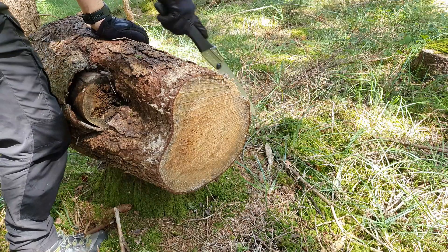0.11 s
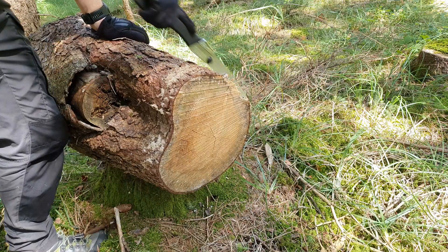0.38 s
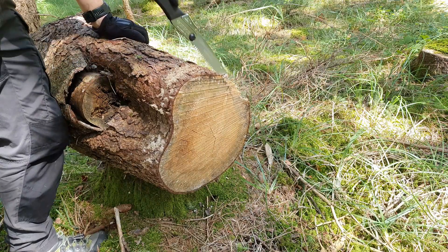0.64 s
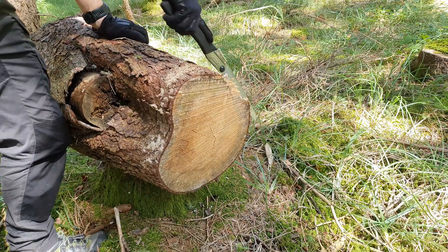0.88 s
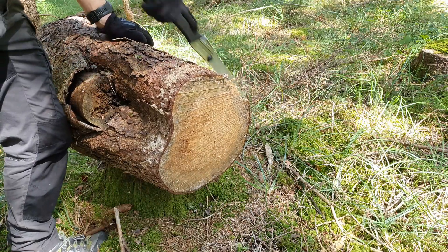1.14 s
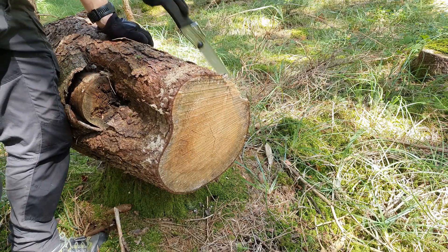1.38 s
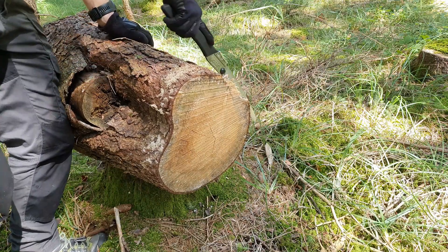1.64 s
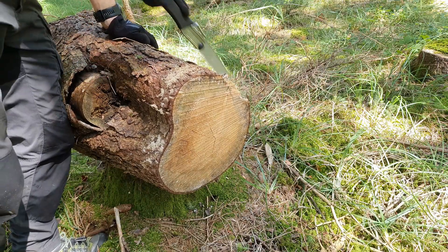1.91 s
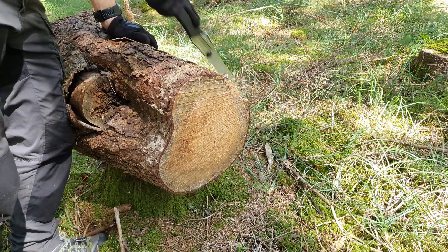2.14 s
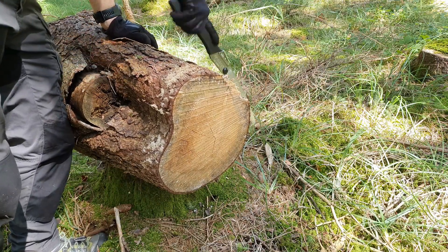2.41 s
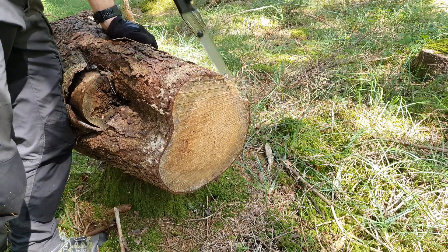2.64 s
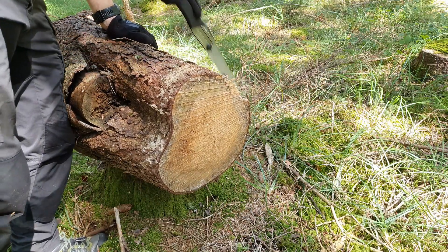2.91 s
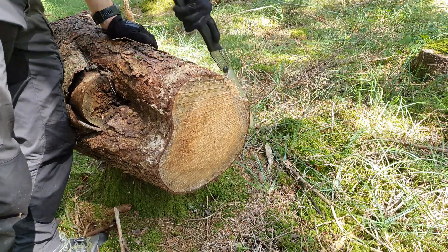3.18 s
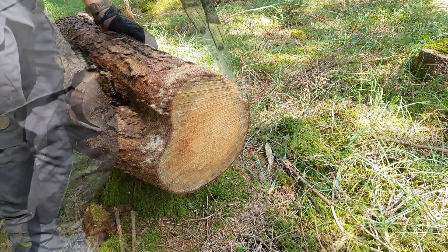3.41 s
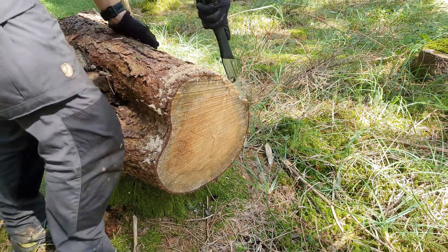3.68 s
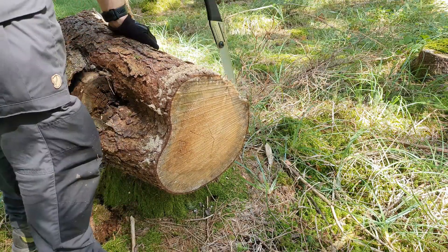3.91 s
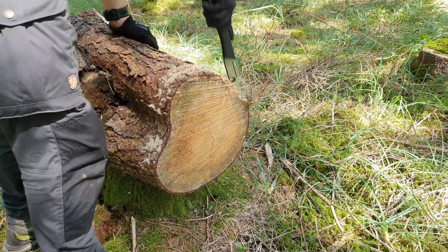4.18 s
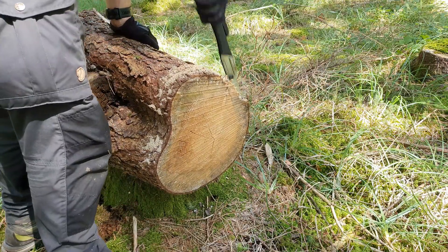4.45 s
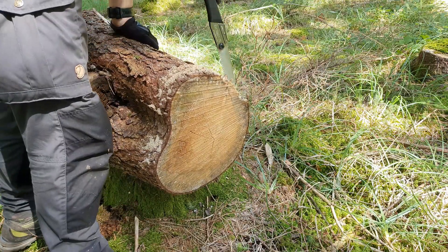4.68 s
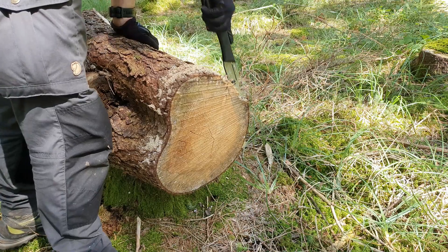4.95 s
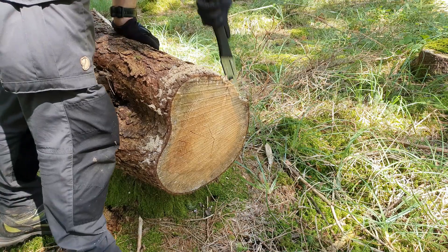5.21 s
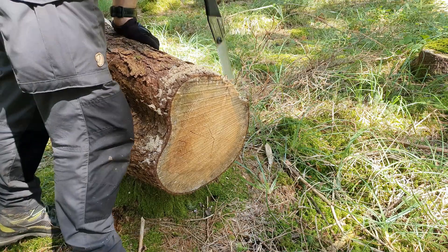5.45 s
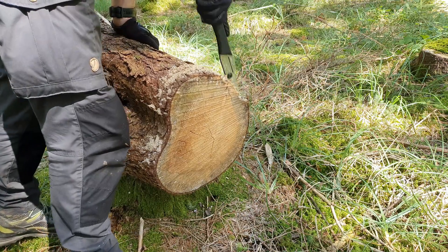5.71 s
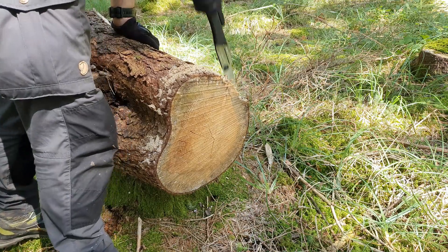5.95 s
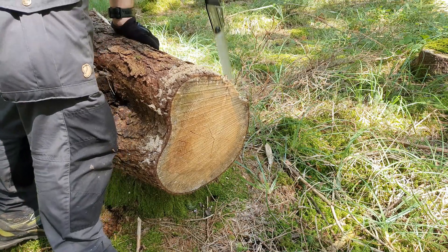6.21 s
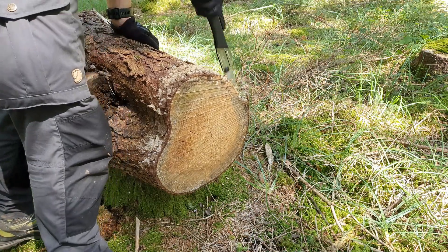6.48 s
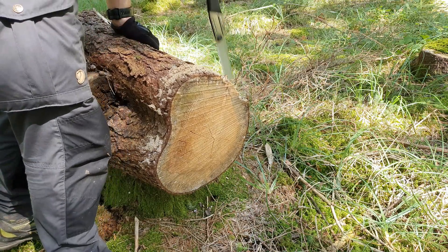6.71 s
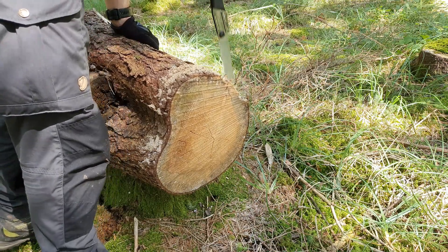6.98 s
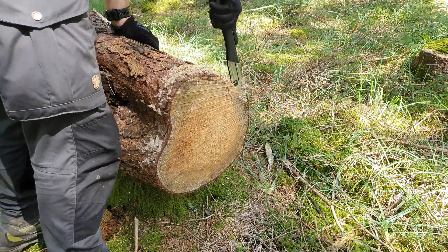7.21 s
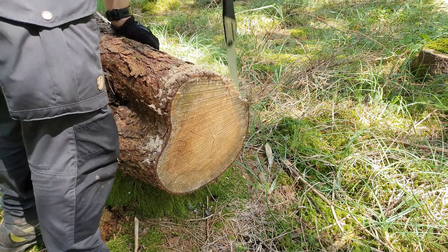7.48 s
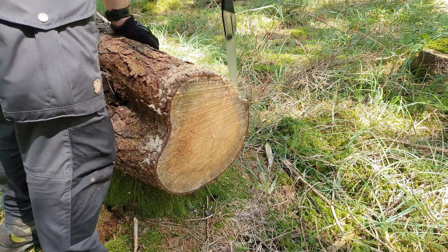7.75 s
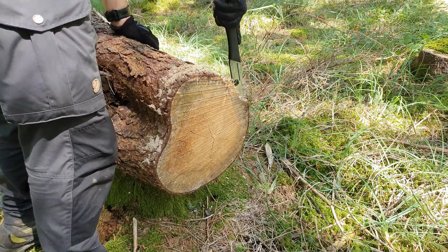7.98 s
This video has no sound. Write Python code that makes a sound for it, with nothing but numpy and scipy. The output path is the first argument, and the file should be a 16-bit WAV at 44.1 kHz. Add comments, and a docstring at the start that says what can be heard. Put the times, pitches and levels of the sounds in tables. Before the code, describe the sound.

Close, dry outdoor sound of a hand saw cutting a thick log, about five alternating strokes a second. Each stroke swells and fades as a gritty rasp with bright sawdust fizz and a hollow woody ring. Handle knocks and a sharp crack punctuate the first half. A near-silent blink and a light drag interrupt midway, then sawing resumes softer and brighter over faint forest air.

```python
"""A folding hand saw rasps through a thick log in a quiet forest, about five strokes a second.
Noise bursts of tearing fibres make the rasp, the fizz of steel on sawdust and, with the buzz of the
passing teeth, the ring of the log; push and pull excite its modes differently.
Decaying sines make knocks of the handle on the bark and dry snaps, over a faint hush of air.
Near the middle the sound drops almost to silence for a few milliseconds."""
import sys
import numpy as np
from scipy import signal
from scipy.fft import rfft, irfft, next_fast_len
from scipy.io import wavfile
from scipy.ndimage import uniform_filter1d

SR = 44100
rng = np.random.default_rng(int(sys.argv[2]) if len(sys.argv) > 2 else 0)


def wav_record(signal):
    """Record a signal, one row per channel, as 16-bit PCM in the file named by sys.argv[1]."""
    frames = np.transpose(np.atleast_2d(signal))
    bounded = np.clip(frames, -1, 1)
    # unit amplitude maps onto the largest positive 16-bit level
    quanta = np.round(bounded * 32767).astype(np.int16)
    wavfile.write(sys.argv[1], SR, quanta)


def to_linear_factor(level_db):
    """Convert decibel levels (scalar or array-like) to linear amplitude factors."""
    exponent = np.asarray(level_db, float) / 20
    return 10 ** exponent


N = 357651

# strokes, push and pull in turn: (start [s], length [ms], teeth passing at full speed [Hz],
# lateness [power of the travel], rasp [dB], extra ring of the log [dB])
STROKES = [(-0.012, 146, 457, 0.86, -44.5, -1), (0.131, 213, 315.4, 0.9, -43, -1.5),
           (0.346, 177, 425.0, 1.29, -46.5, 0.0), (0.525, 218, 342.0, 0.87, -43.5, -2),
           (0.741, 172.6, 436.0, 1.11, -44.5, -2), (0.911, 222, 343, 1.12, -43.5, -3.5),
           (1.135, 173, 445.0, 0.96, -45.5, -1), (1.301, 232, 327, 0.91, -44.5, -0.5),
           (1.531, 177, 446.0, 1.09, -45.5, -0.5), (1.719, 212, 364.3, 0.97, -46.5, 0),
           (1.934, 189, 485, 0.97, -44.5, -1.5), (2.124, 194, 386, 0.91, -43.5, 1.5),
           (2.312, 166, 500.0, 1.22, -45, -1), (2.482, 199, 405.0, 1.04, -43.5, -0.5),
           (2.692, 178, 500.0, 0.98, -45.0, -1.5), (2.872, 194, 394, 0.93, -42.5, -1),
           (3.067, 172.5, 475.0, 1.23, -46.5, -0.5), (3.243, 202, 393.3, 0.97, -43.5, 1.5),
           (3.456, 321, 560.0, 1.02, -56.5, 2), (3.786, 232, 416.0, 0.86, -47.5, 0.5),
           (4.028, 153.4, 560.0, 0.69, -46.0, 2), (4.2, 216, 425.0, 0.76, -44, 0.0),
           (4.409, 166, 484.0, 1.02, -46.5, -1.5), (4.601, 191, 345.0, 0.77, -47, 1.0),
           (4.808, 161, 571.0, 0.72, -49, 0), (4.991, 195, 375.0, 0.79, -48, 1.5),
           (5.183, 175, 402, 0.86, -49.5, 0.5), (5.358, 210, 415.0, 0.86, -48.5, 0),
           (5.56, 177, 448.0, 0.82, -50.5, -4), (5.721, 242, 299.0, 1.015, -50, -2.5),
           (5.947, 154, 528.0, 0.92, -47, 0.5), (6.103, 219, 420.0, 0.94, -46.5, 1.0),
           (6.327, 165, 544.0, 0.96, -48.5, -1.0), (6.491, 240, 411.0, 0.84, -50, 0),
           (6.713, 178.5, 561.0, 1.33, -46, 0.5), (6.893, 227, 355.0, 0.84, -47.5, 0.5),
           (7.108, 165.6, 611.0, 1.38, -44.0, 0.5), (7.281, 228, 425.0, 1.03, -46, 0),
           (7.518, 137.4, 576.0, 1.03, -45, 1), (7.657, 235, 348.0, 0.91, -46, -1.0),
           (7.881, 172, 500.0, 1.1, -48, 2.5), (8.05, 238, 346.6, 1, -47.5, 0)]
# index of the stroke that is a light drag back; after it the blade is held steeper
REGRIP = 18


def evened(x):
    """Scales a signal to an RMS of 1."""
    return x / np.sqrt(np.mean(x ** 2) + 1e-20)


def wander(seconds):
    """Random curve of RMS 1, smoothed over the given time."""
    return evened(uniform_filter1d(rng.standard_normal(N), round(seconds * SR)))


def add(mix, s, sound):
    """Mixes a sound in at s seconds."""
    part = mix[round(s * SR):][:len(sound)]
    part += sound[:len(part)]


def colour(x, points):
    """Filters x by a spectrum of (frequency [Hz], relative level [dB]) points, to an RMS of 1."""
    size = next_fast_len(len(x))
    f, db = np.transpose(points)
    hz = np.fft.rfftfreq(size, 1 / SR)
    gain = to_linear_factor(np.interp(np.log(hz + 1), np.log(f + 1), db))
    return evened(irfft(rfft(x, size) * gain, size)[:len(x)])


def resonate(x, hz, width):
    """Resonance of peak gain 1: shifts the curve hz down to zero, smooths, and shifts back."""
    turn = np.exp(2j * np.pi * np.cumsum(hz * np.ones(len(x))) / SR)
    r = np.exp(-np.pi * width / SR)
    return 2 * (turn * signal.lfilter([1 - r], [1, -r], x / turn)).real


def ring(hz, db, t60, rise=0.00033, lag=0.):
    """A struck mode: a sine that swells briefly and dies by 60 dB in t60 seconds."""
    t = np.maximum(np.arange(round(.25 * SR)) / SR - max(lag, 0), 0)
    shape = (1 - np.exp(-(t / rise) ** 2)) * to_linear_factor(-60 * t / t60)
    return to_linear_factor(db) * shape / shape.max() * np.sin(2 * np.pi * hz * t)


def saw():
    """Tearing fibres feed rasp and fizz; they and the passing teeth ring the log, which also shudders."""
    # modes of the log: (frequency [Hz], width [Hz], level on the push [dB], level on the pull [dB])
    log_modes = [(500, 28.6, -4, -6.5), (614, 36, 2, -3), (747.7, 72, -5.5, -1.5), (928, 123, -6, -3.5),
                 (1006, 81, -5.5, -6.5), (1089, 48, -5.5, -8), (1172, 59, -7, -3), (1448, 42, -8, -7.5),
                 (1920, 83, -13, -31)]
    # torn fibres: (frequency [Hz], relative level [dB])
    rasp_spectrum = [(760, -26.5), (1300, -15.5), (1470, 1), (1630, -2.5), (1820, -0.5), (2020, -3),
                     (2890, -0.5), (3740, -2.5), (4950, -12), (6000, -19), (7800, -54), (13200, -120)]
    # steel on sawdust, blade steep and blade flatter: (frequency [Hz], relative level [dB])
    fizz_steep = [(3240, -14.5), (5500, -6.5), (6010, -6), (7190, 3.5), (8110, 4.5), (10100, 3.5),
                  (12900, -3.5), (15100, 2), (16000, -43)]
    fizz_flat = [(3240, -23), (5500, -20.5), (6200, -3), (7190, 4), (8110, 5.5), (9500, 3), (12500, -3.5),
                 (15100, 0.5), (16000, -31)]
    # teeth are set left and right in turn, so half orders sound too: (multiple of tooth rate, level [dB])
    orders = [(.5, -16), (1, -4), (1.5, -12.5), (2, -4.5), (3, -4.5)]
    # the log shudders on its bed: (frequency [Hz], relative level [dB])
    shudder_spectrum = [(24, -53), (45, -10), (76, 5), (145, 2), (248, 0), (329, 0), (450, -0.5),
                        (580, -47), (990, -120)]
    # slow change as the cut deepens: (time [s], fizz [dB], buzz of the teeth [dB], shudder [dB])
    drift = [(0, -0.5, -2.5, 7), (.6, 0, -1, 2.5), (1.3, -0.5, -3, 1.5), (2.1, -1.5, 2, 2.5),
             (2.9, -1.5, 2.5, -0.5), (3.5, 0.5, -4, 1.5), (4, 3, -12, 3), (4.6, 0, 1.5, -4),
             (5.2, 1, -6.5, 4), (5.8, -1.5, 3.5, -3), (6.4, -1, -3.5, -2.5), (7, -1, -2, 0.5),
             (7.6, -0.6, -0.5, -2), (8.1, -0.8, -1.5, 6)]
    # on (push, pull): buzz of the teeth over the ring [dB]; shudder over the rasp [dB]
    stroke_buzz_db = (-8, -12)
    stroke_shudder_db = (-28.5, -16)

    t = np.arange(N) / SR
    turns, speed, pull, rasp_db, ring_db, fizz_db = arm(t)
    drift_s, *drift_db = np.transpose(drift)
    brighter_db, buzz_db, shudder_db = (np.interp(t, drift_s, column) for column in drift_db)

    # each order of the tooth rate wanders in strength
    bite = evened(uniform_filter1d(rng.standard_normal((N, len(orders))), round(.012 * SR), 0)).T
    buzz = np.zeros(N)
    for (multiple, db), b in zip(orders, bite):
        buzz += to_linear_factor(db + 2.5 * b) * np.sin(2 * np.pi * multiple * turns)
    buzz *= to_linear_factor(np.take(stroke_buzz_db, pull) + buzz_db) * speed ** 0.5

    beat = 1 + 0.1 * np.cos(2 * np.pi * turns)  # tearing grows slightly stronger as each tooth bites
    fibres = beat * tearing(per_s=14000, spread_db=0.5, judder_db=1.18, judder_s=0.011)
    # sawdust sliding along the blade
    dust = tearing(per_s=19000, spread_db=0.5, judder_db=3.0, judder_s=0.0057)
    slide = fibres + 0.97 * dust
    fizz = np.where(t < STROKES[REGRIP][0], colour(slide, fizz_flat), colour(slide, fizz_steep))

    out = to_linear_factor(rasp_db) * colour(fibres, rasp_spectrum)
    out += to_linear_factor(rasp_db + fizz_db + brighter_db) * fizz
    out += chips(rasp_db)
    out += to_linear_factor(rasp_db + ring_db) * buzz

    drive = to_linear_factor(20.5) * tearing(per_s=4000, spread_db=3.5, judder_db=0.0, judder_s=0.0064)
    drive += to_linear_factor(11.5) * buzz
    drive *= to_linear_factor(rasp_db + ring_db)
    for k, (hz, width, push_db, pull_db) in enumerate(log_modes):
        # each mode wanders in strength and pitch as the blade moves in the cut
        louder, higher = wander(.08), wander(.08)
        mode_db = np.where(pull, pull_db, push_db) + 1.8 * louder
        out += (-1) ** k * resonate(drive * to_linear_factor(mode_db), hz * (1 + .008 * higher), width)

    shudder_db = rasp_db + np.take(stroke_shudder_db, pull) + shudder_db
    shudder_db = uniform_filter1d(shudder_db, round(0.015 * SR))
    return out + to_linear_factor(shudder_db) * colour(rng.standard_normal(N), shudder_spectrum)


def arm(t):
    """Turns of the tooth pattern, relative speed, direction, and the levels that follow the travel."""
    # course of a stroke, by direction and hold of the blade, then of the light drag back:
    # (share of the travel, rasp [dB], ring over the rasp [dB], fizz over the rasp [dB])
    push_flat = [(0.0, -36, -8, -12), (0.06, -22.0, 5, -8), (0.12, -14.5, 0.5, -9), (0.2, -7, -3, -10),
                 (0.3, -4, 1.5, -7.0), (0.45, -1, 2.5, -1), (0.6, 2, 1.5, -3.5), (0.75, -2.5, 2.5, -1),
                 (0.88, -7, 0.5, -3.0), (0.95, -19.0, -2, -3), (1.0, -29, 1, -6)]
    pull_flat = [(0.0, -27, -3, -4), (0.06, -16.5, 6.5, 1.5), (0.12, -9.5, -6.5, -1.5),
                 (0.2, -4.5, 0.5, -1.0), (0.3, 0, -4.5, -2), (0.45, 1, -3.5, -3.5), (0.6, 0, -1.5, -3.0),
                 (0.75, -7.5, -4, -4), (0.88, -11.5, -5.5, 0.5), (0.95, -19, -14, 3), (1.0, -36.5, 11, -1)]
    push_steep = [(0.0, -33, -7, 5), (0.06, -22, -8, -10), (0.12, -18.5, -6, -6), (0.2, -15, -3.0, -7),
                  (0.3, -8, -1.5, -6.5), (0.45, -3.5, 3.5, -1.5), (0.6, 0.5, -1.5, -1),
                  (0.75, -1, 2.0, 0.5), (0.88, -7, 1.5, -1.5), (0.95, -21.5, 3, -1), (1.0, -27.5, 1, -3)]
    pull_steep = [(0.0, -30, -4, -3), (0.06, -17.5, -2, -2), (0.12, -12.5, 4.5, 3.5), (0.2, -4.5, 1.5, 3.5),
                  (0.3, -0.5, 2.5, 2.0), (0.45, -0.5, 1, 1.5), (0.6, -2, -0.5, -2), (0.75, -7.5, -1, -3.5),
                  (0.88, -13.5, -6.5, -6), (0.95, -38, 5, -6), (1.0, -31, 4, -2)]
    scrape = [(0, 1, -12, -7), (.03, -2.5, -12, -5.5), (.35, -6, 4.5, 3), (.4, -9, -4, -1.5),
              (.75, 0, 1, 2), (.87, -6.5, -3, 0), (.92, -22.5, 10, -10), (1, -21, 0, -15)]
    # pressure left late in each pull: (time [s], level [dB])
    tail = [(0, -0.5), (3.7, 1), (4, -5.5), (5.2, 2), (5.5, 2), (6.2, -1.5), (6.7, -3), (7.1, 2),
            (7.5, 6.5), (8.1, 2.5)]
    # the blade catches, which shifts the rasp until the next stroke: (time [s], level [dB])
    stalls = [(1.283, -7), (2.074, -16), (2.477, 3), (2.837, -3.5), (6.08, -1.5)]
    # how late full speed comes on (push, pull): [power of the travel]
    speed_late = (1.3, 0.87)

    start, length_ms, top_hz, late, force_db, wood_db = np.transpose(STROKES)
    k = np.clip(np.searchsorted(start, t) - 1, 0, len(start) - 1)
    travel = np.clip(1000 * (t - start[k]) / length_ms[k], 0, 1) ** late[k]
    pull = (k % 2) | (k == REGRIP)

    kind = np.where(k == REGRIP, 4, pull + 2 * (k > REGRIP))
    courses = [np.transpose(c) for c in (push_flat, pull_flat, push_steep, pull_steep, scrape)]
    rasp_db, ring_db, fizz_db = (
        np.choose(kind, [np.interp(travel, c[0], c[column]) for c in courses]) for column in (1, 2, 3))
    rasp_db = rasp_db + force_db[k]
    ring_db = ring_db + wood_db[k]

    late_in_pull = pull * np.exp(-((travel - 0.856) / 0.11) ** 2)
    rasp_db = rasp_db + late_in_pull * np.interp(t, *np.transpose(tail))
    for s, db in stalls:
        rasp_db = rasp_db + db * np.clip((t - s) / .006, 0, 1) * (start[k] < s)  # 6 ms onset

    speed = np.sin(np.pi * travel ** np.take(speed_late, pull)) ** .8
    turns = np.cumsum(top_hz[k] * speed * (1 + 0.0359 * wander(0.00392))) / SR
    return turns, speed, pull, rasp_db, ring_db, fizz_db


def tearing(per_s, spread_db, judder_db, judder_s):
    """Fibres break at random, a few of them hard, and the blade judders so that they come in clumps."""
    breaks = rng.random(N) < per_s / SR
    size = to_linear_factor(spread_db * np.minimum(rng.exponential(1, N), 4)) * breaks
    return evened(size * rng.standard_normal(N) * to_linear_factor(judder_db * wander(judder_s)))


def chips(rasp_db, per_s=60, level_db=-11, follow=0.39, spread_db=8.0):
    """Loose chips and single teeth tick at random, harder while the blade bites."""
    ticks = rng.random(N) < per_s / SR
    size = to_linear_factor(level_db + spread_db * np.minimum(rng.exponential(1, N), 3)) * ticks
    size *= to_linear_factor(follow * (rasp_db + 44.5) - 46.5)
    return signal.oaconvolve(size, snap(-7.5, -9.5))[:N]


def snap(body_db, tick_db):
    """A dry crack: short wooden modes with a bright tick just after the start, the biggest modes later."""
    # wooden body, the biggest modes a moment late: (frequency [Hz], level [dB], t60 [s], rise [s], lag [s])
    body_modes = [(800, -19, .02, .001, 0), (1300, -18, .012, .001, .0003), (1750, -15, .008, .001, .0011),
                  (2550, -4, .0065, .0007, .0009), (2900, -9, .004, .0003, 0),
                  (3350, -4, .006, .0007, .0011), (4150, -8, .005, .0005, .0009),
                  (4900, -9, .005, .0004, .0002), (5700, -13, .005, .0004, .0006)]
    # bright tick: (frequency [Hz], level [dB], t60 [s], rise [s], lag [s])
    tick_modes = [(7400, -0.5, 0.0015, 0.00035, 0.000386), (8800, 2.5, 0.0012, 0.00032, 0.00053),
                  (10650, -2, 0.0024, 0.00027, 0.000426), (14200, -7, .003, 0.00032, .0005)]
    body = sum((-1) ** k * ring(*mode) for k, mode in enumerate(body_modes))
    tick = sum(ring(*mode) for mode in tick_modes)
    return to_linear_factor(body_db) * body + to_linear_factor(tick_db) * tick


def hits():
    """Knocks of the handle (short thud, slow sway, rattling crack) and the separate snaps."""
    # handle meets bark: (time [s], thud [dB], sway of the log [dB], t60 of the sway [s], crack [dB])
    knocks = [(0.8947, -44, -53, 0.13, -50), (1.2780, -42, -66, .08, -30), (1.2838, -40, -58, 0.068, -49),
              (2.0732, -35, -46, 0.08, -27.5), (2.469, -45.5, -59, 0.13, -42),
              (2.8285, -42, -58, 0.051, -30), (2.8350, -35, -46.5, 0.062, -28),
              (4.923, -55, -52.5, 0.21, -65), (5.3150, -52, -53, 0.2, -65), (6.045, -51, -53, 0.18, -60),
              (6.4480, -53, -59, 0.21, -60)]
    # modes of the thud: (frequency [Hz], level [dB], t60 [s])
    thud_modes = [(220, 4, 0.0065), (335, 5.5, 0.0057), (560, -27, 0.028)]
    # snaps of bark and chips: (time [s], body [dB], bright tick [dB])
    snaps = [(0.0245, -37, -34), (0.0493, -47, -32), (0.198, -46, -42), (0.536, -40, -39), (1.03, -38, -27),
             (1.773, -36.5, -35), (2.8272, -10.5, -21), (2.8342, -10.5, -27), (3.4301, -44, -47),
             (3.5515, -54, -40), (3.564, -50, -38), (3.7252, -46, -41), (3.7668, -61.5, -69),
             (3.7793, -58, -70), (3.8391, -47, -42), (4.0090, -61, -69), (4.1950, -73, -76),
             (4.2238, -50, -44), (4.4235, -48.5, -69), (5.007, -42, -48), (6.0382, -33, -48),
             (6.4472, -33, -52), (6.9195, -59, -39), (7.5790, -36, -51), (7.7443, -37.5, -31.5)]
    out = np.zeros(N)
    t = np.arange(round(.25 * SR)) / SR
    for s, thud_db, sway_db, sway_t60, crack_db in knocks:
        thud = to_linear_factor(thud_db) * sum(ring(*mode) for mode in thud_modes)
        sway = ring(74, sway_db, sway_t60, 0.002)
        rattle = resonate(resonate(rng.standard_normal(len(t)), 2400, 4700), 2000, 3500)
        swell = (t / 0.0022) ** 2 * np.exp(2 - t / 0.001)  # strongest after 2 ms
        add(out, s, thud + sway + rattle * swell * to_linear_factor(crack_db))
    for s, body_db, tick_db in snaps:
        add(out, s, snap(body_db, tick_db))
    return out


def trees(x):
    """A weak, dull scatter off the ground and the nearest trunks: decaying noise as an echo tail."""
    t = np.arange(round(.3 * SR)) / SR
    noise = resonate(resonate(rng.standard_normal(len(t)), 700, 1600), 700, 1600)
    tail = noise * to_linear_factor(-60 * t / .04) * (t > .003)
    return x + to_linear_factor(-22) * signal.oaconvolve(x, tail / np.linalg.norm(tail))[:N]


def air():
    """A faint background of coloured noise whose level drifts a little."""
    # forest air and microphone: (frequency [Hz], relative level [dB])
    air_spectrum = [(18, -54), (30, -5), (75, 12), (319, -2), (616, 3), (702, -7), (1160, -11), (1280, -46),
                    (1500, -8), (3670, -19), (5900, -19), (8980, -30), (16000, -27)]
    drift = evened(uniform_filter1d(uniform_filter1d(rng.standard_normal(N), 4000), 4000))
    return to_linear_factor(-71.5 + 3.7 * drift) * colour(rng.standard_normal(N), air_spectrum)


def scene():
    """Saw and hits scatter among the trees, over the air; one channel."""
    return (trees(saw() + hits()) + air())[None]


def roll_off(x):
    """The treble ends steeply here."""
    return signal.sosfilt(signal.butter(12, 16820, fs=SR, output="sos"), x)


def record(dry):
    """The microphone loses the deepest bass; the sound cuts out for a few milliseconds."""
    # the gap in the sound: (start [s], end [s])
    gap_start, gap_end = (3.452, 3.458)
    t = np.arange(N) / SR
    # the outer gains hold for all the time before and after the gap
    gate = np.interp(t, [gap_start - .003, gap_start, gap_end, gap_end + 0.0012], [0.86, .03, 0.026, 0.9])
    heard = signal.sosfilt(signal.butter(4, 48, "high", fs=SR, output="sos"), dry)
    return roll_off(heard * gate)


dry = scene()
out = record(dry)
wav_record(out)
```